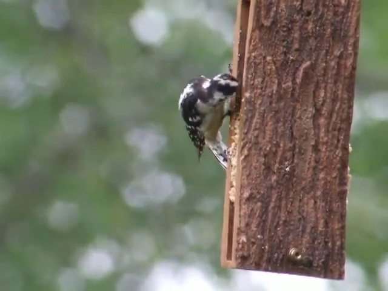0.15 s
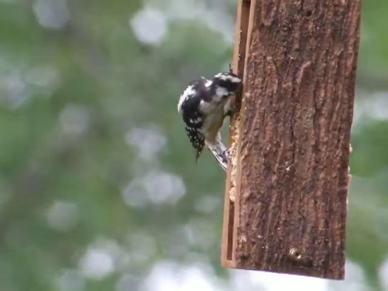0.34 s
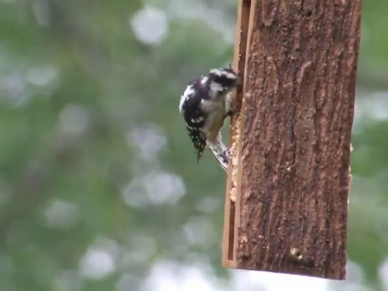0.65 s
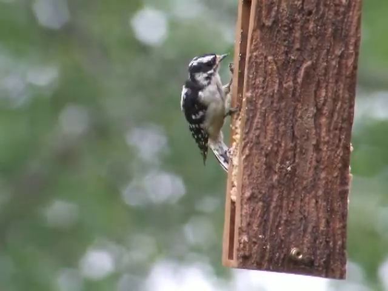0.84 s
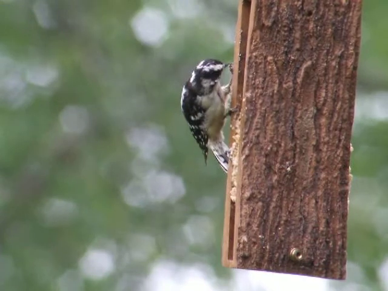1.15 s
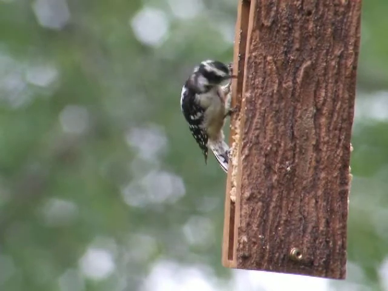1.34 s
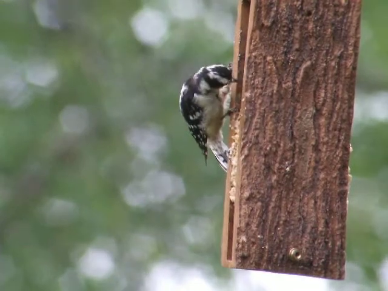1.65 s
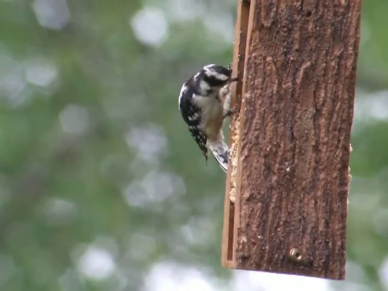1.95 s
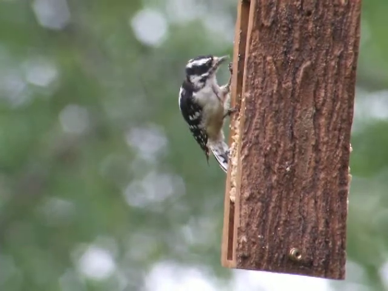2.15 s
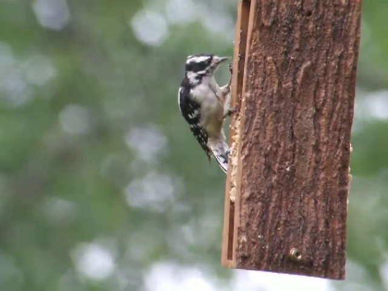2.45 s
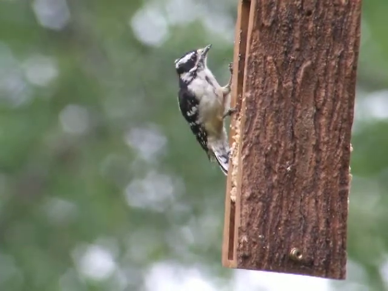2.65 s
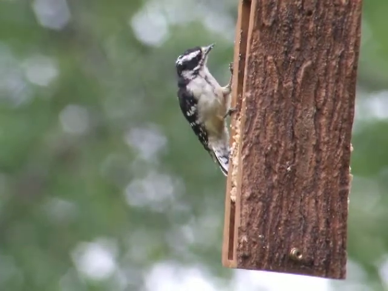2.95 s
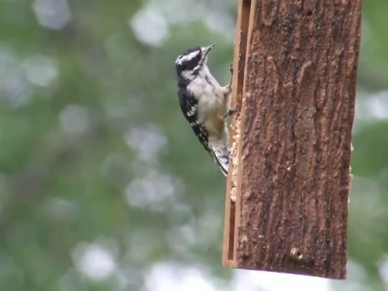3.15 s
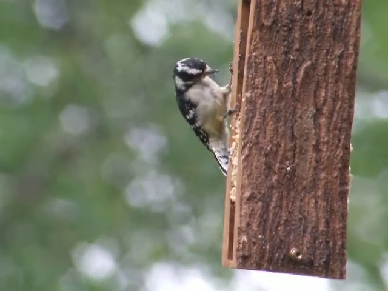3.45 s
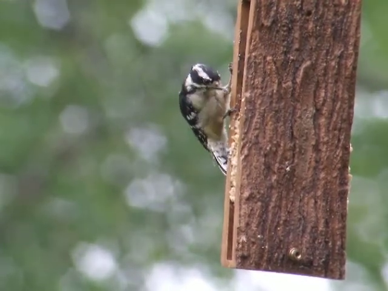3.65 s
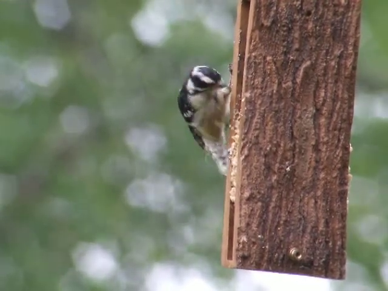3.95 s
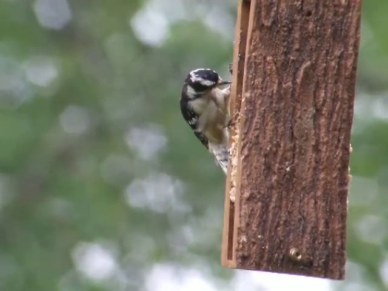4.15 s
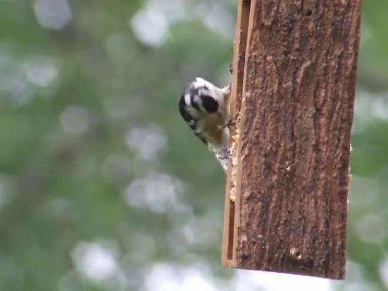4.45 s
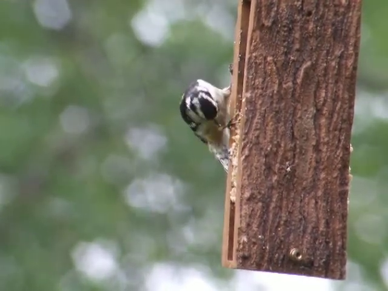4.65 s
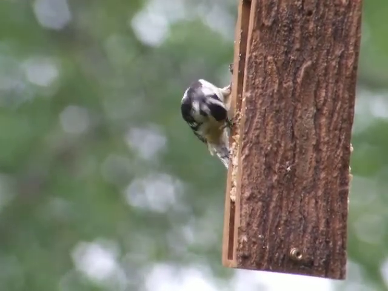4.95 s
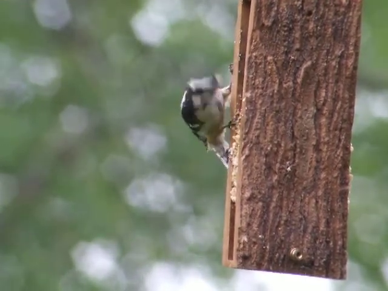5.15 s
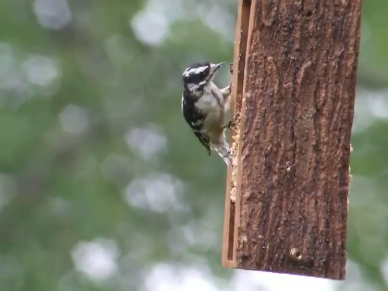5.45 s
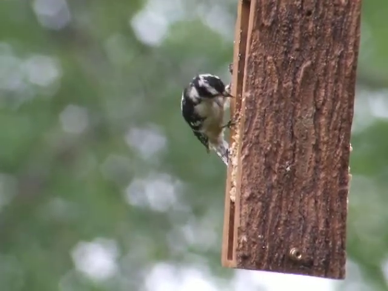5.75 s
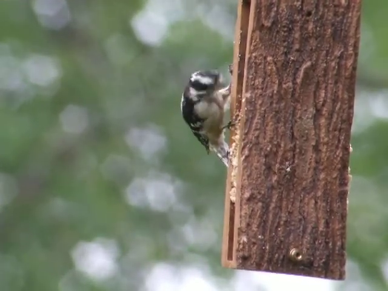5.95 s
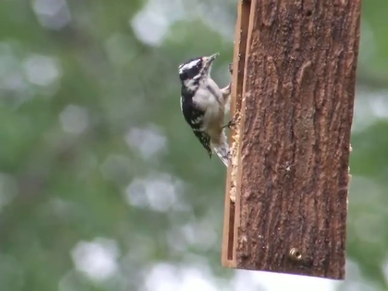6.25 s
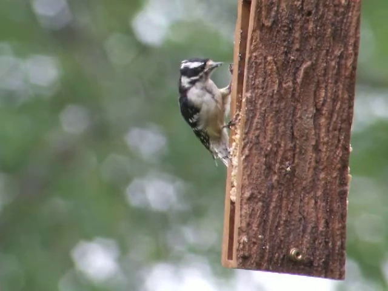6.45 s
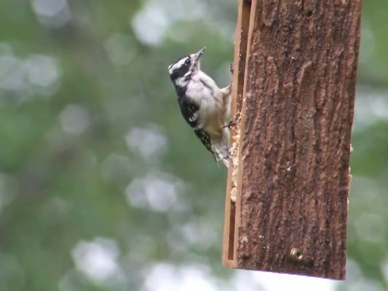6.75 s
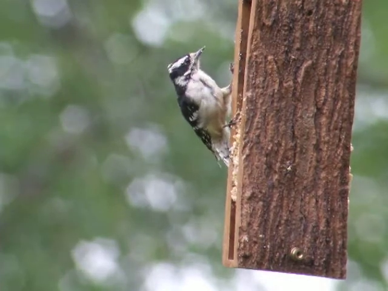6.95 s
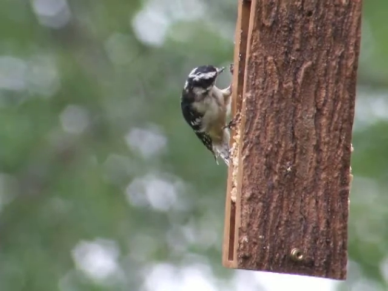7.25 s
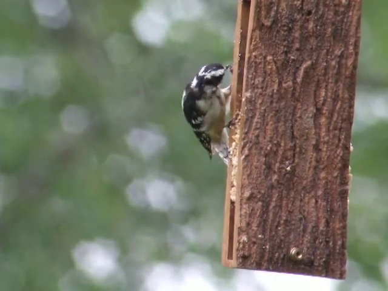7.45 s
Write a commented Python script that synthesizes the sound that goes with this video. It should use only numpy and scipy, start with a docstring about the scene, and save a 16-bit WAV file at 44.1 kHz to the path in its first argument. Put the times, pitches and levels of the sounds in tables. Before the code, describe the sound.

A small woodpecker pecks suet from a hanging wooden feeder in a quiet garden. Its sharp, dry taps come in uneven clusters, with tiny picking ticks between them and a few faint rubs as the feeder rocks. The pecks are strongest in the middle, then thin to single taps, and a distant bird chirps once. A gritty recording hiss, low rumble and light wind on the microphone lie underneath.

```python
"""A quiet garden opens on far rumble, a steady hum, light wind on the microphone and a distant engine.
From 0.4 s a small woodpecker pecks suet from a hanging wooden feeder: each impact cracks at the contact
and excites the modes of the boards. Trees return a faint echo, the rocking feeder rubs on its mount, and
the bird picks at crumbs between blows. A far tone swells near 5 s, a far bird chirps at 6.2 s, and the
last blow falls at 7.6 s. Throughout, the camera's coarse converter adds a gritty quantisation hiss."""
import sys
import numpy as np
from scipy import signal
from scipy.fft import rfft, irfft
from scipy.io import wavfile

SR = 44100
rng = np.random.default_rng(int(sys.argv[2]) if len(sys.argv) > 2 else 0)


def generate_wav(signal):
    """Clip the signal to [-1, 1] and save it as 16-bit WAV at the path in sys.argv[1]."""
    frames = np.transpose(np.atleast_2d(signal))
    scaled = np.clip(frames, -1, 1) * 32767
    pcm = np.round(scaled).astype(np.int16)
    wavfile.write(sys.argv[1], SR, pcm)


N = 335601

# spectrum of far rumble and microphone hiss: f/Hz, relative density/dB
AIR_SPECTRUM = [(15, -43.5), (25, -9), (65, -2), (122, -3.5), (208, -9.5), (300, -16), (550, -14.5),
                (1000, -17), (2000, -19), (4000, -22), (6000, -23.5), (8000, -23)]
# steady hum and thin whines: f/Hz, bandwidth/Hz, relative level/dB
HUM_LINES = [(79.1, 4, -65.5), (6986, 420, -65.5), (7573, 36, -66)]
# gusts on the microphone: peak t/s, half length/s, relative level/dB
WIND_GUSTS = [(0, .05, -42), (0.202, 0.053, -43), (0.703, .7, -57), (4.408, 0.07, -55)]
# course of the far engine: t/s, f/Hz, level/dB
ENGINE_COURSE = [(.9, 122.7, -75.5), (1.4, 126, -61.5), (2.5, 127.7, -67), (3.3, 128, -69.5),
                 (4.4, 132, -67), (5.9, 146.7, -67.5), (6.5, 123.1, -76), (7.61, 120.9, -61.5)]
# blows of bill and claws: t/s, level near 2-4 kHz/dB re 1 ms at full scale, hardness/dB, spot
BLOWS = [(0.4161, -26.5, 7.5, "hollow"), (0.438, -33.5, -5.5, "edge"), (0.4437, -36.5, 6, "suet"),
         (0.4501, -35.5, 4, "hollow"), (0.4661, -34, 7, "cavity"), (0.494, -28.5, 2, "cavity"),
         (0.5669, -29.5, 5, "suet"), (0.7247, -26, 5, "suet"), (0.8382, -28.5, 8.5, "crust"),
         (0.898, -35.5, -3.5, "frame"), (1.3387, -31.5, -8, "bark"), (1.3664, -37.5, -6.5, "bark"),
         (1.4191, -29, 6.5, "slot"), (1.5034, -35.5, -4, "frame"), (1.584, -39.5, -10, "bark"),
         (1.6173, -38.5, 2, "bark"), (1.6504, -28, 3.5, "edge"), (1.8156, -36.5, -5, "frame"),
         (2.188, -40.5, 3, "frame"), (2.7059, -27, -1, "rim"), (2.7693, -35, 2, "frame"),
         (2.7829, -30.5, 4, "post"), (2.7849, -24, 5, "rim"), (2.8852, -31.5, -1, "edge"),
         (2.9026, -25, 3.5, "rim"), (2.908, -27.5, -2.5, "rim"), (2.9403, -26, -5, "rim"),
         (2.9632, -16.5, -1, "frame"), (3.0435, -39, -5, "hollow"), (3.5733, -31, -3, "bark"),
         (3.5797, -25, 12.5, "crust"), (3.6686, -27.5, -6.5, "edge"), (3.973, -39, 10.5, "corner"),
         (3.9968, -35.5, 1, "frame"), (4.0343, -30.5, 8.5, "post"), (4.0524, -36, 4.5, "edge"),
         (4.2836, -33, -0.5, "edge"), (4.2938, -25, 4.5, "corner"), (4.317, -16, 3.5, "post"),
         (4.3488, -35, -8.5, "hollow"), (5.1567, -36.5, -8, "frame"), (5.262, -23, 1, "edge"),
         (5.2795, -34, 12, "corner"), (5.295, -38.5, -1, "hollow"), (5.3217, -31, -7, "frame"),
         (5.4095, -32, -1.5, "frame"), (5.447, -31, 10, "corner"), (5.5431, -19.5, 5, "rim"),
         (5.8597, -29, -1, "bark"), (6.1085, -28.5, -0.5, "bark"), (6.3133, -33, -4, "bark"),
         (7.587, -30, -8.5, "bark")]
# struck spots, by name: panel f/Hz, thump/dB, low mids/dB, crack over ring/dB, spot f/Hz
STRUCK_SPOTS = {"suet": (561, 0.5, -11, 1, 6807), "crust": (544, -7, -6, -3, 6506),
                "cavity": (560, -8, -1, 0.5, 2169), "hollow": (877.5, -4.5, -0.5, -6, 1122.5),
                "slot": (561, -12, 1, 0.5, 1397), "frame": (771, -9.5, -6, -4, 2338),
                "bark": (770, -10.5, -9, -6, 3100), "edge": (801.5, -13.5, -9.5, -7, 3749),
                "rim": (875.5, -17, -10, -9, 5056.5), "corner": (770.5, -11, -6, -7, 6919),
                "post": (768.5, -7, -8, 2, 5901)}
# brief resonances at the contact: f/Hz, bandwidth/Hz, relative level/dB
CONTACT_RESONANCES = [(1110, 280, -2.5), (1400, 1300, 1), (2445, 250, -9.5), (3570, 220, -10.5),
                      (4270, 870, -9), (5820, 310, 0.5), (6750, 1000, 6.5), (7970, 1200, 11.5)]
# normal modes of the boards: f/Hz, relative level/dB, T60/s
WOOD_MODES = [(1112, -5.5, 0.073), (1294, -2, .045), (1510, -7, 0.039), (1753, -6, 0.038),
              (2100, -0.5, 0.038), (2347, -1, .055), (2530, -1, 0.037), (2967, 1.5, .036),
              (3214, 2.5, 0.032), (3488, -1, 0.045), (3780, -2, 0.042), (3954, 1, .04), (4223, -11.5, 0.06),
              (4806, -3, .04), (5020, 2.5, 0.045), (5370, -4.5, 0.031), (5840, 0, 0.058), (6240, 8, 0.027),
              (6430, -10, 0.049), (6740, -2.5, 0.063), (7276, 2, 0.043), (7816, 3.5, 0.083)]
# edges of a blow's four bands (knock, low mids, upper mids, treble): f/Hz
BLOW_BAND_EDGES = [380, 950, 1900, 4400, 8700]
# the feeder rubs as it rocks: start t/s, length/s, groan level/dB, scrape over groan/dB
MOUNT_RUBS = [(0.423, 0.054, -54.5, -8), (2.979, 0.087, -48, -8.5), (3.052, 0.051, -50, -15),
              (3.504, 0.091, -49, -15.5), (4.334, 0.056, -50.5, -8)]
# the bird picks at crumbs and shifts its grip: start t/s, end t/s
PICKING_SPELLS = [(.5, 1.0), (1.37, 1.95), (3.85, 4.06)]


def undb(db):
    """Amplitude ratio of a level in decibels."""
    return 10 ** (np.asarray(db) / 20)


def unit(x):
    """Normalisation to rms 1."""
    return x / np.sqrt(np.mean(x ** 2) + 1e-30)


def burst(x):
    """Normalisation to the energy of 1 ms at full scale."""
    return x / np.sqrt(np.sum(x ** 2) * 1000 / SR + 1e-30)


def band(x, lo_hz, hi_hz, order):
    """Causal Butterworth band-pass filtering."""
    return signal.sosfilt(signal.butter(order, [lo_hz, hi_hz], "band", fs=SR, output="sos"), x)


def fade(t, t60):
    """Exponential damping, 60 dB in t60 seconds."""
    return np.exp(-np.log(1000) * t / t60)


def coloured(gain):
    """Spectral shaping of white noise by gain(f/Hz), at rms 1."""
    hz = np.maximum(np.arange(N // 2 + 1) * SR / N, 1)
    return unit(irfft(rfft(rng.standard_normal(N)) * gain(hz), N))


def walk(rate_hz):
    """Low-pass random fluctuation of rms 1."""
    return coloured(lambda hz: 1 / (1 + (hz / rate_hz) ** 4))


def swell_at(peak_s, half_s):
    """Gaussian envelope, down to 1/e at half_s from its peak."""
    return np.exp(-((np.arange(N) / SR - peak_s) / half_s) ** 2)


def add(out, s, x):
    """Superposition of x on out from second s."""
    i = int(s * SR)
    out[i:i + len(x)] += x[:max(N - i, 0)]


def air(level_db=-59, waver_db=.13):
    """Broadband noise: far rumble and microphone hiss, with the level set between 200 Hz and 8 kHz."""
    f, db = np.transpose(AIR_SPECTRUM)
    noise = coloured(lambda hz: undb(np.interp(np.log(hz), np.log(f), db)))
    noise /= np.std(band(noise, 200, 8000, order=3))
    return noise * undb(level_db + waver_db * walk(2.4))


def hum(gain_db=-1):
    """Narrow-band noise: each broadened spectral line is heard as a hum or a thin whine."""
    return sum(undb(db + gain_db) * coloured(lambda hz: 1 / (1 + (2 * (hz - centre) / width) ** 2))
               for centre, width, db in HUM_LINES)


def wind(calm_db=-72, gain_db=-2):
    """Low-frequency pressure fluctuations on the microphone swell with each gust."""
    strength = undb(calm_db) + sum(undb(db) * swell_at(s, half) for s, half, db in WIND_GUSTS)
    buffeting = unit(band(rng.standard_normal(N), 12, 37, order=2))
    return buffeting * strength * undb(gain_db)


def drone(hz, db, waver_db=3, drift=.02):
    """Random amplitude and frequency modulation: a distant tone wavers on its way."""
    phase = 2 * np.pi * np.cumsum(hz * (1 + drift * walk(8.8))) / SR
    return unit(np.sin(phase)) * undb(db + waver_db * walk(5))


def engine():
    """A far engine is heard as a single partial, gliding in frequency and level."""
    t = np.arange(N) / SR
    times, hz, db = np.transpose(ENGINE_COURSE)
    return drone(np.interp(t, times, hz), np.interp(t, times, db))


def contact(t, spot_hz, crack_s=.00025, direct_db=-6, spot_db=-9, spot_t60=.0053):
    """Impulsive excitation: a force lasting about a millisecond rings the struck spot."""
    force = rng.standard_normal(len(t)) * t * np.exp(-t / crack_s)
    crack = sum(undb(db) * band(force, hz - width / 2, hz + width / 2, order=1)
                for hz, width, db in CONTACT_RESONANCES)
    spot = np.sin(2 * np.pi * spot_hz * t) * fade(t, spot_t60) * (1 - np.exp(-t / crack_s))
    return burst(crack + undb(direct_db) * force) + undb(spot_db) * burst(spot)


def boards(t, spot_hz, spread=.005, place_db=4, spot_db=-10):
    """Modal vibration: damped modes, weighted at random for where the bill lands; one pitch stands out."""
    hz, db, t60 = np.transpose(WOOD_MODES)[:, :, None]
    place, detune, turn = rng.standard_normal((3, len(hz), 1))
    phase = 2 * np.pi * (hz * (1 + spread * detune) * t + turn)
    modes = undb(db + place_db * place) * fade(t, t60) * np.sin(phase)
    dense_modes = rng.standard_normal(len(t)) * fade(t, t60=.055)
    spot = np.sin(2 * np.pi * spot_hz * t) * fade(t, t60=.018)
    return burst(modes.sum(0)) + burst(dense_modes) + undb(spot_db) * burst(spot)


def blow(hard_db, spot, ring_rise_s=.00046, panel_rise_s=.0023, flex_db=-2, knock_db=-4):
    """Impact on a panel: it cracks, rings and flexes; a harder contact gives more treble and crack."""
    panel_hz, thump_db, mid_db, crack_db, spot_hz = STRUCK_SPOTS[spot]
    crack_db += .98 * hard_db
    t = np.arange(int(.12 * SR)) / SR
    crack = contact(t, spot_hz)
    ring = boards(t, spot_hz) * (1 - np.exp(-t / ring_rise_s))
    # slow bending waves make the low body arrive a little late
    swell = 1 - np.exp(-t / panel_rise_s)
    flex = burst(np.sin(2 * np.pi * panel_hz * t) * fade(t, t60=.042) * swell)
    knock = burst(band(ring, *BLOW_BAND_EDGES[:2], order=2) * swell)
    out = undb(thump_db) * (undb(flex_db) * flex + undb(knock_db) * knock)
    # the higher the band, the more of its energy lies in the crack
    levels_db, leans_db = (mid_db, 0, hard_db), (-4, -1, 2)
    for lo, hi, db, lean_db in zip(BLOW_BAND_EDGES[1:], BLOW_BAND_EDGES[2:], levels_db, leans_db):
        sharp = burst(band(crack, lo, hi, order=5))
        woody = burst(band(ring, lo, hi, order=5))
        out += undb(db) * burst(undb(crack_db + lean_db) * sharp + woody)
    return out


def woodpecker():
    """Superposition of the impacts of bill and claws, each at its own strength."""
    out = np.zeros(N)
    for s, db, hard_db, spot in BLOWS:
        add(out, s, undb(db) * blow(hard_db, spot))
    return out


def garden_echo(x, near_s=.0057, near_db=-16, delay_s=.024, echo_db=-21, grain_db=4.6):
    """Reflection and scattering: one near return, then weak ones from trunks, leaves and walls."""
    t = np.arange(SR // 2) / SR
    noise, grain = rng.standard_normal((2, len(t)))
    returns = noise * undb(grain_db * grain) * fade(t, t60=.33) * (t > delay_s)
    response = band(returns, 350, 9000, order=1)
    response *= undb(echo_db) / np.sqrt(np.sum(response ** 2))
    response[int(near_s * SR)] += undb(near_db)
    return signal.fftconvolve(x, response)[:N]


def rubbing(groan_hz=(620, 940), scrape_hz=(1100, 4200), grain_db=5):
    """Stick-slip friction: uneven slips of wood on its mount drive mostly the panel's low resonance."""
    out = np.zeros(N)
    for s, length, db, scrape_db in MOUNT_RUBS:
        n = int(length * SR)
        noise, grain = rng.standard_normal((2, SR // 4))[:, :n]
        slips = noise * undb(grain_db * grain)
        groan = unit(band(slips, *groan_hz, order=1))
        scrape = undb(scrape_db) * unit(band(slips, *scrape_hz, order=2))
        add(out, s, undb(db) * signal.windows.tukey(n, .5) * (groan + scrape))
    return out


def picking(gap_s=.12, level_db=-46.5, scatter_db=6):
    """Weak impacts on the frame, jittered in time and strength, are heard as faint ticks."""
    out = np.zeros(N)
    for start, end in PICKING_SPELLS:
        times = np.arange(start, end, gap_s)
        for s, (late, strength) in zip(times, rng.uniform(-.92, 1, (len(times), 2))):
            tick = undb(level_db + scatter_db * strength) * blow(hard_db=-1.5, spot="frame")
            add(out, s + gap_s * (late + 1) / 4, tick)
    return out


def far_tone():
    """Slow amplitude modulation: a faint far tone swells once and fades."""
    return drone(hz=383, db=-69.5) * swell_at(peak_s=4.97, half_s=.23)


def far_bird(start_s=6.175, length_s=.074, from_hz=4300, to_hz=3550, peak_db=-59):
    """A linear frequency sweep: one falling chirp from the trees."""
    out, n = np.zeros(N), int(length_s * SR)
    phase = 2 * np.pi * np.cumsum(np.linspace(from_hz, to_hz, n)) / SR
    add(out, start_s, undb(peak_db) * np.hanning(n) * np.sin(phase))
    return out


def scene():
    """Superposition of the garden's background, the feeder's direct sound and its echo."""
    background = air() + hum() + wind() + engine() + far_tone() + far_bird()
    feeder = woodpecker() + rubbing() + picking()
    return (background + feeder + garden_echo(feeder))[None]


def record(dry, camera_hz=16000, cutoff_hz=8000, step=.0056):
    """Quantisation: quiet sound toggles between two of the converter's coarse steps as a gritty hiss."""
    fine_hz = np.lcm(camera_hz, SR)
    # the same steep low-pass limits aliasing on the way in and smooths the steps on the way out
    taps = signal.firwin(32 * fine_hz // camera_hz + 1, cutoff_hz, window=("kaiser", 9), fs=fine_hz)
    sampled = signal.resample_poly(dry, camera_hz, SR, axis=1, window=taps)
    stepped = step * np.floor(sampled / step)
    return signal.resample_poly(stepped, SR, camera_hz, axis=1, window=taps)[:, :N]


dry = scene()
out = record(dry)
generate_wav(out)
```